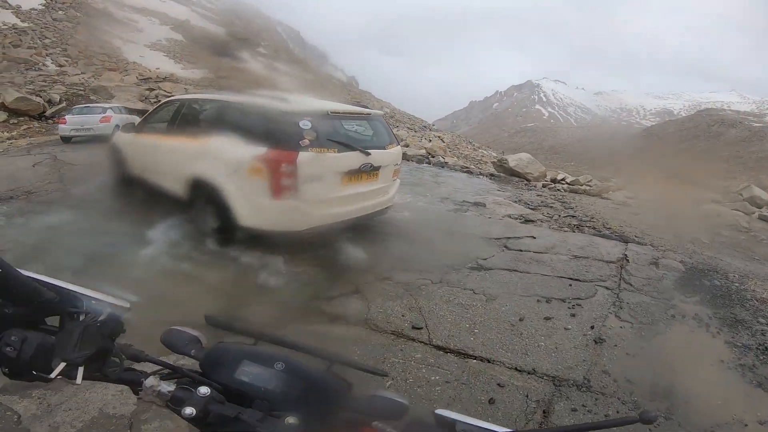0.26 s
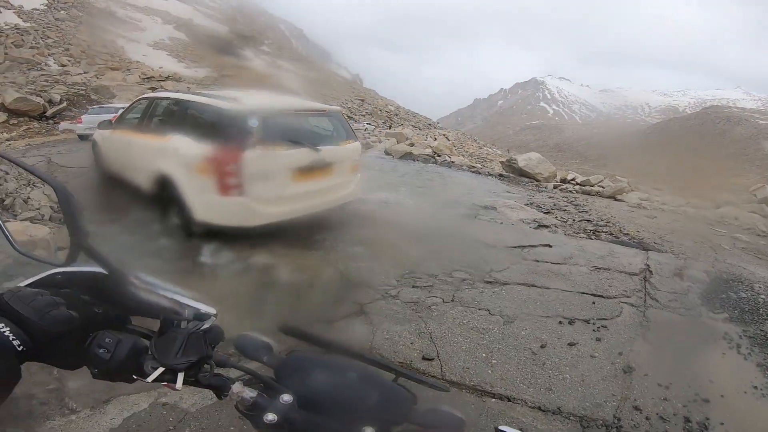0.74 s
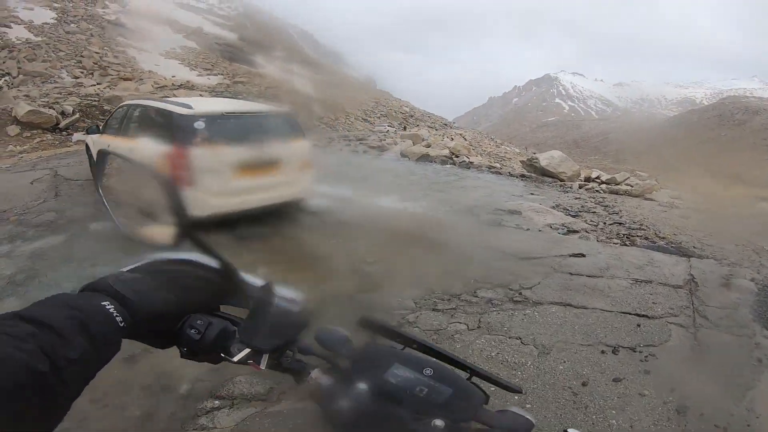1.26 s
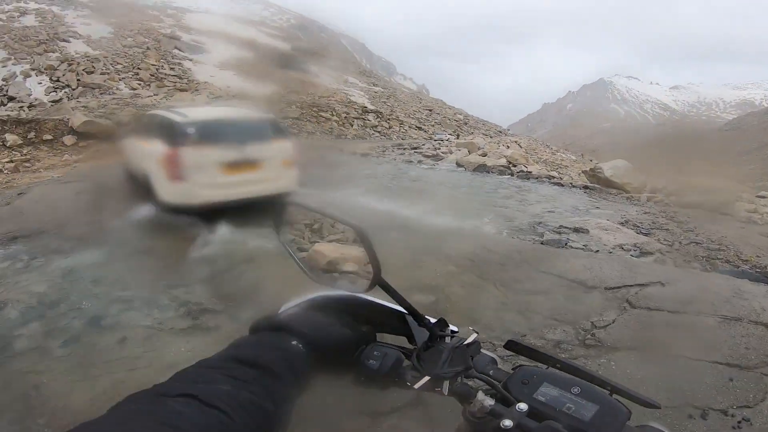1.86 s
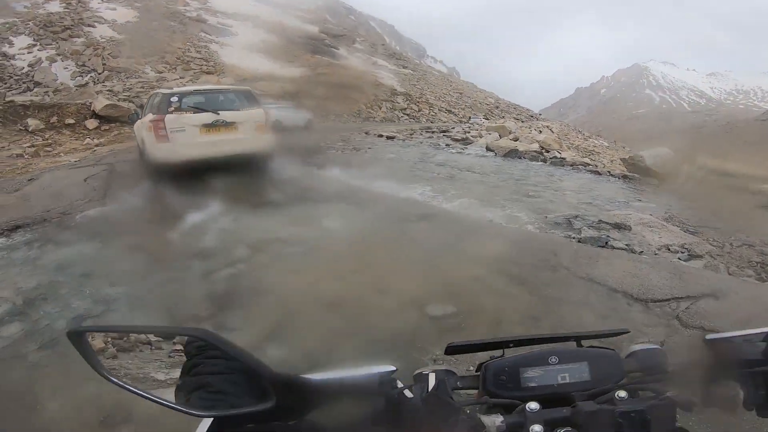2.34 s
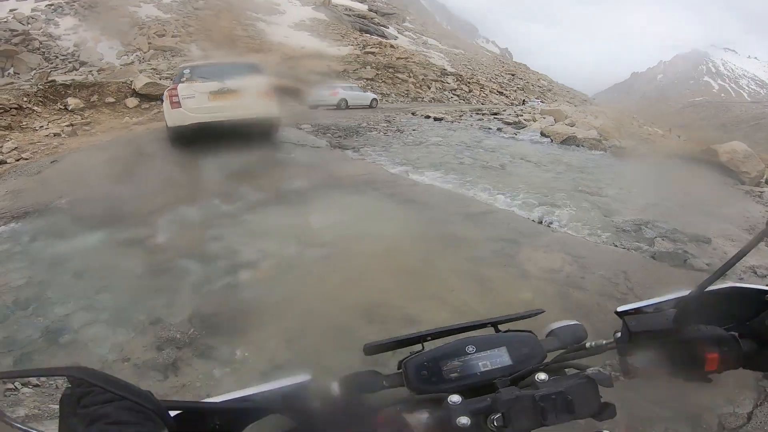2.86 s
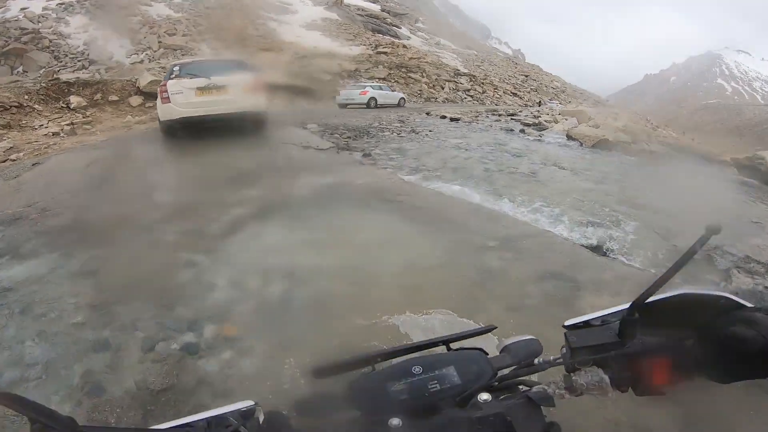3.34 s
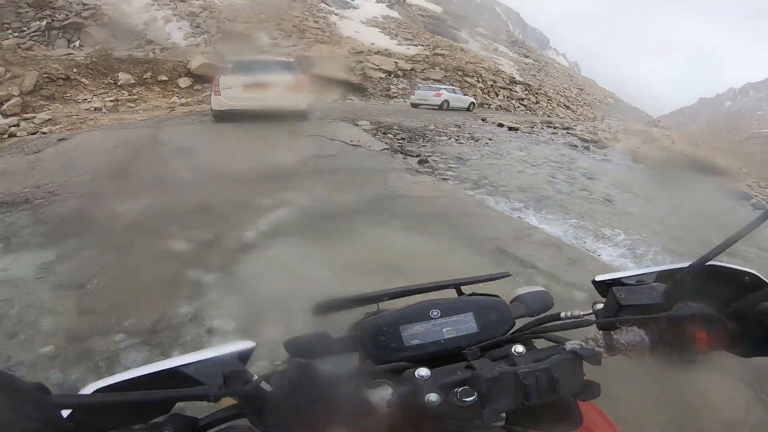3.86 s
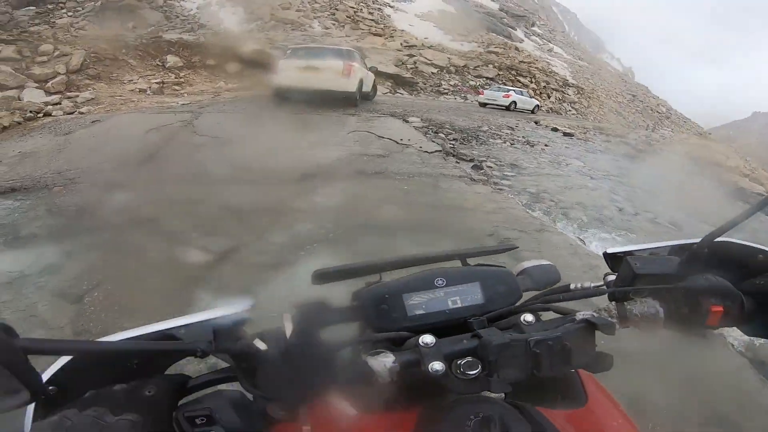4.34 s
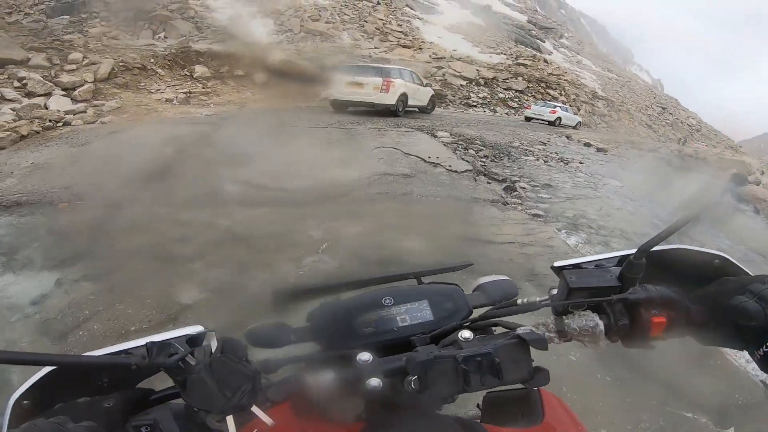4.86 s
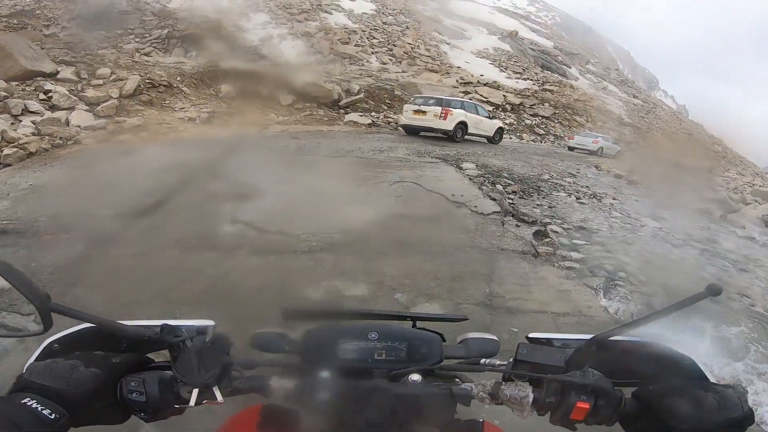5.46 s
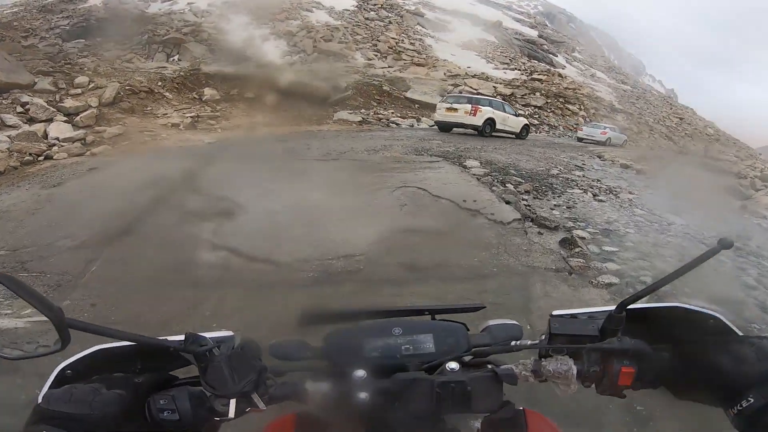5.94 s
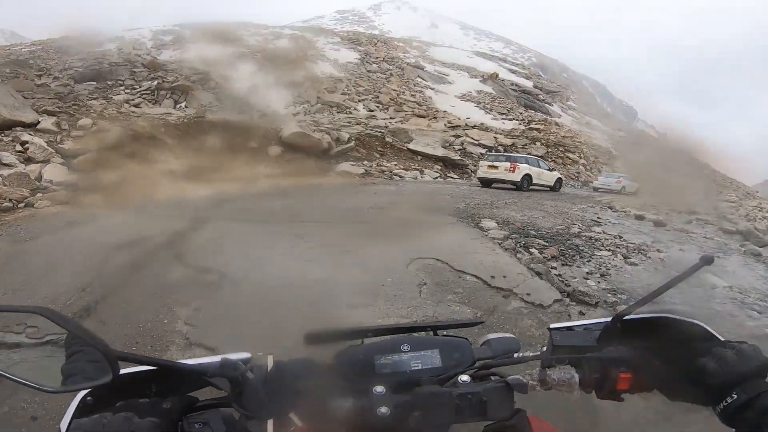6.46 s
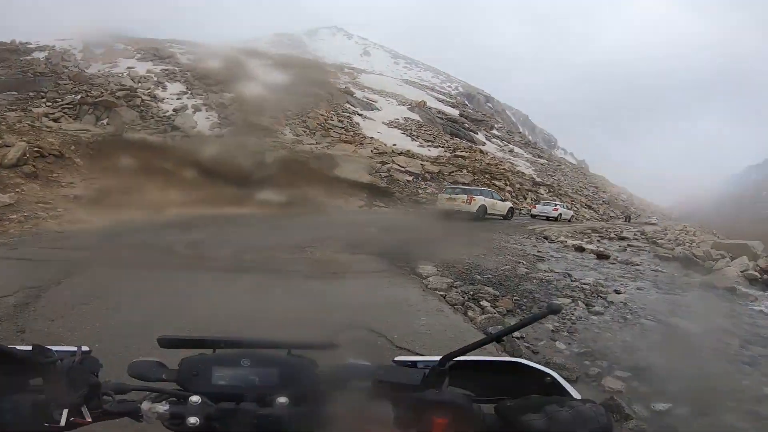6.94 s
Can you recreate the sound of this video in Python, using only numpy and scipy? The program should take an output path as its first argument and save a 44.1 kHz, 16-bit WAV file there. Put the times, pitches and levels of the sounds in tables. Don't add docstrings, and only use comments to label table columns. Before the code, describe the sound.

From 0 to 2.5 s a single-cylinder motorcycle chugs quietly through shallow water: a low wavering hum, briefly revving near 0.5 s, with steady bright spray hiss, mechanical clatter, soft wind buffets and dull bumps at about 0.4-0.8 s. Small splashes come at 0.2, 2.6 and 2.9 s. The revs sag until about 3.2 s into slow, labouring thumps while the water thins. At 3.3-3.6 s stones knock, the underside scrapes and a heavy wind gust rumbles. From 3.7 to 4.3 s loose panels clunk and ring among tiny grit ticks as the throttle opens. The engine climbs quickly to a loud, hollow, rasping roar by 4.9 s, wavering until about 5.8 s, and nearly mono. It then eases down in pitch and loudness to 7.2 s, with buzzing metallic overtones, widening space and returning water hiss. Close chest microphone, outdoors, no noticeable echo.

```python
import sys
import numpy as np
from scipy import signal
from scipy.fft import rfft, irfft
from scipy.io import wavfile
from scipy.ndimage import uniform_filter1d

SR = 44100
rng = np.random.default_rng(int(sys.argv[2]) if len(sys.argv) > 2 else 0)


def transcribe(signal):
    frames = np.atleast_2d(signal).T
    limited = np.clip(frames, -1, 1)
    pcm = np.round(limited * 32767).astype(np.int16)
    wavfile.write(sys.argv[1], SR, pcm)


def boost_factor(decibels):
    exponent = np.asarray(decibels, float) / 20
    return 10 ** exponent


N = 317952
BLOCK = 64


def curves(table):
    s, *columns = np.transpose(table)
    return [np.interp(np.arange(N) / SR, s, c) for c in columns]


def swells(table):
    t = np.arange(N) / SR
    return sum(db * np.exp(-(2 * (t - s) / length) ** 2) for s, db, length in table)


def shape(table, hz):
    f, db = np.transpose(table)
    return np.interp(np.log(np.maximum(hz, 1)), np.log(f), db, left=-120, right=-120)


def resonances(table, hz):
    return sum(top_db / (1 + (2 * (hz - f) / width) ** 2) for f, width, top_db in table)


def colour(x, table, rings=()):
    hz = np.fft.rfftfreq(N, 1 / SR)
    y = irfft(rfft(x) * boost_factor(shape(table, hz) + resonances(rings, hz)), N)
    return y / np.std(y)


def walk(rate):
    k = int(SR / rate)
    held = np.repeat(rng.standard_normal(N // 200 + 2)[:N // k + 1], k)
    w = uniform_filter1d(uniform_filter1d(held, k), k)[:N]
    return w / np.std(w)


def patchy(x, slow_db, quick_db):
    spectrum, hz = rfft(x), np.fft.rfftfreq(N, 1 / SR)
    octave = np.floor(np.log2(np.maximum(hz, 16) / 16))
    bands = (irfft(spectrum * (octave == k), N) * boost_factor(quick_db * walk(16)) for k in range(11))
    return sum(bands) * boost_factor(slow_db * walk(6.8))


def drops(rate, spread_db):
    size = boost_factor(spread_db * rng.exponential(size=N).clip(0, 4.5)) * (rng.random(N) < rate / SR)
    return rng.standard_normal(N) * (1 + uniform_filter1d(size, size=40) * 40 ** .5)


def hits(table, tone):
    out, t = np.zeros(N + SR), np.arange(SR // 3) / SR
    for s, db, hz, t60 in table:
        if tone:
            wave, rise_s = np.sin(2 * np.pi * hz * t), .0015
        else:
            sos = signal.butter(3, [hz / 2, hz * 1.6], "band", fs=SR, output="sos")
            band = signal.sosfilt(sos, rng.standard_normal(len(t)))
            wave, rise_s = .5 * band / np.std(band), 1.5 / hz + .0005
        decay = 1000 ** (-t / max(t60, .005))
        out[int(s * SR):][:len(t)] += boost_factor(db) * wave * decay * (1 - np.exp(-t / rise_s))
    return out[:N]


# start_s, firing_rate_hz
SPEED_CURVE = [(0, 32.5), (.55, 38.9), (.95, 31.7), (1.55, 29.8), (1.9, 25.8), (2.55, 25.3), (3.2, 17.5),
               (4.03, 38.6), (4.19, 41), (4.6, 58), (4.9, 66.8), (5.12, 67.2), (5.33, 63.4), (5.58, 68.6),
               (5.8, 67.1), (6.16, 58.6), (6.63, 52.6), (7.21, 48.1)]
# start_s, cycle_scatter_db, order_wander_db
ROUGHNESS = [(0, .8, 2.2), (2.5, .8, 2.2), (3.2, 2.5, 3), (3.75, 2.1, 3), (4.1, 2.1, 3), (4.3, 1.1, 2.5),
             (4.55, .6, 2.2), (6.1, .5, 1.8), (7.21, .4, 1.8)]


def crank():
    flywheel_s = .1
    scatter_db, wander_db = curves(ROUGHNESS)
    hz = uniform_filter1d(curves(SPEED_CURVE)[0], int(flywheel_s * SR))
    turns = np.cumsum(hz * (1 + .003 * scatter_db * walk(25))) / SR
    cycle = boost_factor(scatter_db * np.interp(turns, np.arange(600), rng.standard_normal(600)))
    return hz, turns, cycle, scatter_db, wander_db


# start_s, level_db over coasting
THROTTLE = [(0, 0.5), (.4, 6), (.7, -2), (1.3, -0.5), (3.1, 2), (3.5, 6.5), (3.9, 15), (4.15, 16),
            (4.45, 10), (4.8, 14.5), (5.2, 13.5), (5.35, 13.5), (5.6, 14.5), (5.95, 10.5), (6.2, 10.5),
            (6.5, 6), (6.9, 5.5), (7.21, 6)]


def throttle():
    return curves(THROTTLE)[0]


# centre_s, pitch_hz, level_db, length_s
BROAD_ORDER_SWELLS = [(4.716, 1210, 3.5, 0.081), (4.78, 2180, 11, 0.22), (4.79, 930, 3, 0.17),
                      (4.835, 1300, 7, 0.056), (5.056, 1000, 10.5, 0.07), (5.545, 1040, 8, 0.23),
                      (5.68, 1830, 8, 0.61), (5.83, 1420, 7, 0.51), (5.92, 1310, 5, 0.24),
                      (5.8, 1180, 3.5, 0.16), (4.953, 1690, -14, 0.43), (.45, 64.6, 0, .2),
                      (0.73, 140, 7.5, 0.16), (0.77, 94, 7.5, 0.21), (1.404, 237, 4.5, 0.25),
                      (1.856, 55, 1.5, .3), (2.14, 126, 6.5, 0.62), (3.6, 46, -7, 0.38), (3.767, 122, 1.5, 0.12),
                      (3.7, 200, -8.5, 0.56), (3.98, 290, -7.5, 0.2), (4.106, 320, -3.5, .1),
                      (4.38, 279, -7.5, 0.17), (4.635, 232, -9.5, 0.097), (4.85, 400, 4, 0.79),
                      (5.8, 260, 1.5, 0.31), (5.504, 130, 9.5, 0.25), (6.205, 231, 3, 0.23),
                      (6.94, 2430, 7.5, 0.88), (7.0, 870, -18, 0.77), (4.665, 180, 12, 0.28),
                      (3.95, 140, 8, 0.35), (4.25, 440, -1.5, 0.27), (5.9, 1300, 1, 0.18),
                      (4.7, 690, -4.5, 0.62), (0.54, 400, -6, 0.27), (4.4, 120, 4, 0.23),
                      (5.545, 272, -8, 0.072), (5.62, 273, 1.5, 0.056), (4.744, 250, 3.5, 0.067),
                      (4.89, 266, -1, .08), (4.99, 269, 2.5, .08), (5.9, 260, -8, 0.16), (5.9, 260, -6, .1),
                      (5.56, 410, 6, .08), (5.62, 410, -5, .06), (5.34, 385, -3, 0.11), (4.64, 355, -3.5, 0.074),
                      (4, 400, 4, .08), (5.21, 390, 2, .08)]
# centre_s, pitch_hz, level_db, length_s
NARROW_ORDER_SWELLS = [(0.48, 1200, 8, .16), (.48, 1680, 8, .14), (0.31, 290, 3.5, 0.14),
                       (5.44, 1060, 5, .06), (5.6, 1100, 6, .08), (5.3, 1200, 8, .16),
                       (6.02, 1400, 12, .06), (6.37, 1100, 7, .08), (5.5, 1500, 7, .2),
                       (6.45, 1230, 4, .16), (6.5, 2400, 14, .16), (6.6, 1120, 8, 0.13),
                       (6.66, 2330, 15, 0.11), (6.7, 1600, 2, 0.12), (6.85, 1610, 10, .3),
                       (6.92, 1110, 4, 0.11), (7.1, 2200, 13, .25), (8.2, 1600, 4, .2),
                       (6.1, 1480, -6, .12), (4.72, 1220, 5, .08), (5.2, 880, 7, .08),
                       (4.84, 1430, 8, .08), (4.84, 1240, 6, .1), (4.9, 1070, 4.5, 0.068),
                       (4.75, 2170, 5.5, .1), (4.9, 2130, 8, .08), (5.75, 1880, 4, 0.28),
                       (5.82, 1340, 1, .15), (4.9, 1400, 4, .1), (5.7, 1900, 3, .1), (5.3, 540, 3, 0.17),
                       (5.55, 545, 3, 0.21), (4.62, 590, 6, .1), (2.58, 105, 8.5, .3), (3.0, 90, 8, .2),
                       (3.3, 85, -10, .14), (4.65, 127, 5, .2), (5.95, 2700, 15, .35), (7.1, 2700, 11, .2),
                       (7.1, 2700, 9, .2)]


def order_swells(f):
    s = np.arange(f.shape[1]) * BLOCK / SR
    db = 0
    for table, spread in ((BROAD_ORDER_SWELLS, 0.14), (NARROW_ORDER_SWELLS, .035)):
        for at, pitch, top_db, length in table:
            width_hz = 41 + spread * pitch
            db = db + top_db * np.exp(-(2 * (s - at) / length) ** 2 - (2 * (f - pitch) / width_hz) ** 2)
    return boost_factor(db)


# firing_rate_hz, order_1_db to order_8_db
ORDER_LEVELS = [(19.3, -43, -30, -45, -48, -47, -37, -40, -50),
                (25.3, -31.5, -25.5, -42, -40, -34, -47.5, -44, -50),
                (30.4, -30.5, -27, -34, -26, -44, -39, -46.5, -41.5),
                (33.45, -28, -29.5, -33.5, -31, -48.5, -42.5, -44.5, -38.5),
                (39, -22.5, -26.5, -37, -46, -47.5, -39, -48, -38),
                (41, -29, -13.5, -25.5, -42, -50.5, -54, -49, -38),
                (49, -26.5, -17.5, -22, -31, -52, -38, -50.5, -50),
                (52.4, -23.5, -18.5, -23.5, -39, -48, -42, -42, -44.5),
                (56.5, -19, -19, -26, -27.5, -39, -41, -47.5, -51),
                (58.8, -17, -24.5, -36, -19.5, -39, -43, -50.5, -44.5),
                (64.24, -14.5, -31, -36.5, -24, -43, -38.5, -58, -45),
                (65.56, -13.5, -39, -40.5, -25.5, -48, -38.5, -67, -52),
                (66.97, -14, -40.5, -45, -22.5, -45.5, -39, -50.5, -45.5),
                (68.1, -14.5, -35.5, -48, -16.5, -47, -42, -56, -42.5)]
# pitch_hz, level_db
PIPE = [(80, -7), (105, 6), (125, 13), (145, -2), (200, -6.5), (240, -1), (290, 4.5), (340, -6.5),
        (400, -1), (460, -8.5), (540, -9), (620, -16.5), (750, -20)]
# pitch_hz, level_db
BAFFLES = [(750, -12), (800, -2.5), (900, -4.5), (1070, -2), (1250, -4.5), (1500, -8.5), (1900, -14.5),
           (2200, -16), (2700, -24.5), (3600, -27)]
# pitch_hz, width_hz, level_db
CASE_MODES = [(550, 60, 4), (1070, 60, 8), (1220, 45, 6), (1450, 60, 5), (2200, 100, 6), (2650, 100, 4),
              (3250, 130, 5), (4530, 70, 6), (5150, 90, 6), (8000, 200, 4), (9800, 300, 6)]


def order_sizes(hz, effort, scatter_db, wander_db):
    coasting_scatter_db = scatter_db[0]
    hz, effort, scatter_db, wander_db = (c[::BLOCK] for c in (hz, effort, scatter_db, wander_db))
    order = np.arange(1, 61)[:, None]
    f = order * hz
    drift = np.array([walk(4 + k / 2.5 + (k > 8) * k / 2.5)[::BLOCK] * (1 + k / 50) for k in order[:, 0]])

    low_wander = .45
    crawl = np.clip(39 - hz, 0, 1)
    rate, *orders_db = np.transpose(ORDER_LEVELS)
    eight_db = [np.interp(hz, rate, db) + .7 * crawl * (.5 - d ** 2) for db, d in zip(orders_db, drift)]
    upper_db = [db + 0.77 * effort + low_wander * wander_db * d for db, d in zip(eight_db[4:], drift[4:])]
    bark_db = -44 + 1.55 * effort - 4.5 * (scatter_db - coasting_scatter_db).clip(0)
    rasp_db = -43 + 0.84 * effort

    db = (order % 2) * np.where(f > 750, -4.5, -5.0 * (f > 200))
    db = db + (4 - 0.85 * effort) * (f > 170) * (f < 280)
    db = db + wander_db * drift * np.where(order < 9, low_wander, 1)
    db = db + np.where(f < 750, shape(PIPE, f), shape(BAFFLES, f) + 0.2 * resonances(CASE_MODES, f))
    size = boost_factor(db) * np.clip((61 - order) / 15, 0, 1)

    part = np.where(order < 5, order - 1, np.where(f < 750, 4, 5))
    for p, load_db in enumerate(eight_db[:4] + [bark_db, rasp_db]):
        mine = part == p
        counted = mine * ((p < 4) | (f > 280))
        rms = np.sqrt(np.sum(counted * size ** 2 / 2, axis=0) + 1e-18)
        size = np.where(mine, size * boost_factor(load_db) / rms, size)
    size[4:8] = 2 ** .5 * boost_factor(np.array(upper_db))
    size = uniform_filter1d(size * order_swells(f), size=20, axis=1)
    return size, part == 5, drift, bark_db, rasp_db


def at_sample_rate(blocks):
    return np.repeat(blocks, BLOCK)[:N]


def exhaust(effort):
    hz, turns, cycle, scatter_db, wander_db = crank()
    size, in_rasp, drift, bark_db, rasp_db = order_sizes(hz, effort, scatter_db, wander_db)
    low, rasp = np.zeros(N), np.zeros(N)
    block_at = np.arange(N) / BLOCK
    for k, a, r, d in zip(range(1, 61), size, in_rasp, np.roll(drift, 7, axis=0)):
        phase = 2.15 * k * k if k < 9 else .03 * k * k + 1.1 * rng.standard_normal()
        slip = .02 * scatter_db * min(k, 25) * np.interp(block_at, np.arange(len(d)), d)
        wave = at_sample_rate(a) * np.sin(2 * np.pi * k * turns + phase + slip)
        high = at_sample_rate(uniform_filter1d(1. * r, size=30))
        low += wave * (1 - high)
        rasp += wave * high * boost_factor(1 - 3.2 * scatter_db)
    gate = 1 + 0.5 * np.exp(-(turns % 1) / 0.25) + 0.76 * np.exp(-((turns + .5) % 1) / 0.038)
    grit = colour(rng.standard_normal(N) * gate * boost_factor(1.8 * walk(30)), BAFFLES, CASE_MODES)
    rasp += grit * at_sample_rate(boost_factor(rasp_db)) * boost_factor(4.5 * scatter_db - 13.5)
    churn = colour(rng.standard_normal(N) * gate, PIPE[4:])
    low += churn * at_sample_rate(boost_factor(bark_db)) * boost_factor(7 * scatter_db - 19.5)
    return low * cycle, rasp * cycle, gate * cycle ** 0.38 / np.sqrt(np.mean(gate ** 2))


# pitch_hz, level_db per Hz
CLATTER_SPECTRUM = [(260, -32), (450, -7), (700, -12), (1070, -12), (1760, -16), (2500, -16), (3400, -17),
                    (4830, -25), (5950, -50), (7800, -77)]


def engine_clatter(gate, effort):
    sound = colour(rng.standard_normal(N) * gate, CLATTER_SPECTRUM, CASE_MODES)
    return sound * boost_factor(-43.5 + 0.68 * effort)


# start_s, level_db
STREAM_LEVEL = [(0, -51), (.56, -49.5), (.9, -52), (2.5, -50), (2.75, -53), (2.95, -54), (3.08, -59),
                (3.25, -62.5), (4.3, -67), (5.6, -66.5), (6.5, -57), (7.21, -55)]
# centre_s, level_db above the stream, length_s
SLOSHES = [
    (.21, 3, 0.069),
    (2.0, -0.5, 0.21),
    (3.18, 3.5, .1),
    (3.42, 3, 0.088),
    (.12, 3, .05),
    (1.35, 1, .12),
    (2.63, 2, .06),
]
# pitch_hz, level_db per Hz
WATER_SPECTRUM = [(210, -37.5), (350, -26.5), (506, 0.5), (543, -4), (866, -1), (1180, -4.5), (1290, -0.5),
                  (1710, -2.5), (2080, -3.5), (2690, -5.5), (3250, -6.5), (4420, -12.5), (7670, -16),
                  (10300, -39.5), (13400, -69.5), (22000, -120)]
# pitch_hz, width_hz, level_db
MUDGUARD_MODES = [(1200, 50, 5), (1680, 60, 4), (2700, 90, 5), (3900, 120, 3), (7600, 200, 3)]
# pitch_hz, level_db per Hz
WATER_APART = [(150, -51), (250, -17), (411, -14), (677, -8), (816, -5.5), (1060, -5.5), (3210, -15),
               (4320, -19), (7450, -18), (8310, -19), (10300, -39), (13400, -60.5), (22000, -120)]


def stream(apart_db):
    water_db = curves(STREAM_LEVEL)[0]
    water = patchy(colour(drops(1500, 2.5), WATER_SPECTRUM, MUDGUARD_MODES), 0.62, 0.46)
    water *= boost_factor(water_db + 15.0 + swells(SLOSHES))
    apart = patchy(colour(drops(1500, 3.0), WATER_APART), .4, 0.9) * boost_factor(apart_db)
    return water, apart, water_db


# centre_s, level_db above the hiss, length_s
SPRAY_BURSTS = [
    (.02, -4, 0.09),
    (.2, 5, 0.078),
    (2.43, 2.5, .3),
    (3.18, 9, 0.033),
    (3.4, -2, 0.67),
    (3.58, 2, .08),
    (4.07, 5.5, 0.55),
]
# pitch_hz, level_db per Hz
VALVE_SPECTRUM = [(3650, -54.5), (6200, -22), (6870, -3), (7840, -1), (8250, 2), (8670, -1), (9550, -7),
                  (10300, -15), (13400, -43), (22000, -120)]


def valve_gear(gate, water_db):
    level_db = -52.5 + 0.19 * (water_db - water_db[0]) + swells(SPRAY_BURSTS)
    sound = colour(rng.standard_normal(N) * gate, VALVE_SPECTRUM, CASE_MODES)
    return sound * boost_factor(level_db - 5.0), level_db


# centre_s, level_db above the rumble, length_s
SCRAPES = [
    (3.33, -1, .04),
    (3.4, 2.5, 0.045),
    (3.43, 12.5, 0.085),
    (3.485, 3.5, .04),
]
# pitch_hz, level_db per Hz
RUMBLE_SPECTRUM = [(15, -8), (30, -3), (70, 3.5), (140, -5), (300, -9.5), (600, -16), (1200, -22)]


def road_rumble(effort):
    sound = patchy(colour(rng.standard_normal(N), RUMBLE_SPECTRUM), 1.2, 2.5)
    return sound * boost_factor(-30.5 - 0.25 * effort + swells(SCRAPES))


# start_s, level_db of their difference kept
PORT_FOLD = [
    (0, -0.5),
    (2.88, -0.5),
    (3.36, -14),
    (3.62, -25),
    (4.2, -25),
    (5.55, -58),
    (5.65, -18.5),
    (6.05, -7.5),
    (6.55, -2),
    (7.21, -2.5),
]


def port_fold():
    return curves(PORT_FOLD)[0]


# centre_s, level_db above the breeze, length_s
GUST_SWELLS = [(0, 4, 0.16), (.5, 14, 0.12), (.85, 5, 0.25), (1.2, 14, 0.15), (1.9, 11, 0.22),
               (2.62, 14, 0.14), (2.82, 15.5, 0.24), (3.0, 18.5, 0.23), (3.13, 21, 0.14), (3.42, 34, 0.29),
               (5.95, 23, 0.082), (6.45, 8, 0.44)]
# pitch_hz, level_db per Hz
WIND_SPECTRUM = [(12, -19.5), (30, -10.5), (60, -5), (130, -14.5), (260, -30.5), (500, -56.5)]


def wind_on_ports(fold_db):
    gust = boost_factor(-41.5 + 1.5 * fold_db + swells(GUST_SWELLS) + 3.0 * walk(8.2))
    return [colour(rng.standard_normal(N), WIND_SPECTRUM) * gust for _ in range(2)]


# pitch_hz, level_db per Hz
AIR_SPECTRUM = [(9300, -20), (10800, -4), (11800, 0), (12600, -1), (14000, -6), (15000, -12), (15800, -22),
                (17000, -60)]


def fine_air():
    return [patchy(colour(drops(800, 3.0), AIR_SPECTRUM), 1.0, 1.5) * boost_factor(-76) for _ in range(2)]


# start_s, level_db, pitch_hz, t60_s
SPLASHES = [
    (0.2014, -22, 6030, 0.12),
    (2.624, -23, 6000, 0.11),
    (2.7794, -32, 5930, 0.12),
    (2.9186, -26, 6100, 0.11),
    (3.1794, -48, 5940, 0.11),
    (4.041, -42, 6030, 0.098),
    (4.145, -46, 6000, 0.089),
]


def splashes():
    return signal.sosfilt(signal.butter(6, 9300, fs=SR, output="sos"), hits(SPLASHES, False))


# start_s, level_db, brightness_hz, t60_s
STONE_KNOCKS = [(3.311, -16.5, 780, 0.073), (3.329, -21, 780, 0.12), (3.375, -30, 300, 0.074),
                (3.40, -22, 300, 0.1), (3.421, -20, 730, 0.22), (3.445, -32, 400, 0.12),
                (3.465, -28, 305, 0.058), (3.747, -17, 396, 0.3), (4.034, -26, 900, 0.06),
                (4.055, -16, 1000, 0.044), (4.145, -19, 1500, 0.033), (5.96, -18, 151, 0.028),
                (.352, -13, 110, 0.076), (.433, -7, 150, .05), (.668, -9, 125, 0.081),
                (.728, -7, 110, 0.083), (.8, -4, 121, 0.096), (1.553, -20, 120, 0.062),
                (1.692, -14, 110, 0.046), (3.147, -11, 130, 0.1), (3.178, -29, 2300, .05),
                (3.2, -20, 302, 0.086), (3.327, -12, 1500, 0.019), (3.362, -24, 1600, 0.11),
                (3.39, -25, 1700, .06), (3.425, -24, 1900, 0.069), (3.455, -26, 2000, .08),
                (3.475, -27, 1700, .08), (3.51, -28, 1600, .08), (3.58, -30, 2000, .06),
                (3.63, -27, 1500, .08), (3.552, -21.5, 950, 0.053), (3.591, -20, 1100, 0.052),
                (3.839, -16, 1100, 0.046), (3.868, -24, 2600, 0.03), (3.915, -8, 70, 0.25),
                (3.99, -2, 65, 0.17), (4.027, -20, 2270, 0.023), (4.066, -27, 2500, 0.04),
                (3.925, -25.5, 2200, .04), (3.985, -28, 2200, 0.045), (4.08, -23, 1900, .03),
                (4.235, -24, 1040, 0.026), (4.275, -32, 3000, .03)]


def stone_knocks():
    return hits(STONE_KNOCKS, False)


# start_s, level_db, pitch_hz, t60_s
LABOURING = [(2.52, -28, 52, .2), (2.605, -22, 60, .2), (2.705, -23, 50, .2), (2.78, -19, 65, 0.17),
             (2.858, -15, 80, .1), (2.915, -21, 50, .15), (2.995, -17, 55, .15), (3.035, -21, 105, .1),
             (3.145, -26, 130, .08), (3.2, -28, 115, .08), (3.418, -21, 150, .05), (1.545, -30, 90, .08),
             (1.685, -25, 70, .1)]


def labouring_thumps():
    return hits(LABOURING, True)


# start_s, level_db, pitch_hz, t60_s
GUARD_RINGS = [
    (3.309, -25, 1090, .05),
    (3.328, -27, 1750, .02),
    (3.327, -21, 600, .03),
    (3.424, -32, 1130, .08),
    (3.416, -16, 110, .14),
    (3.44, -22, 680, .06),
]


def guard_strike():
    return hits(GUARD_RINGS, True)


# start_s, level_db, pitch_hz, t60_s
GRIT_TICKS = [
    (3.7364, -28, 2400, 0.015),
    (3.7714, -28, 2400, 0.015),
    (3.8026, -26, 2400, 0.015),
    (3.8364, -22, 2400, 0.015),
    (3.9227, -28, 2400, 0.015),
    (4.0257, -22, 2400, 0.015),
    (4.0625, -24, 2400, 0.015),
    (4.144, -27, 2400, 0.015),
    (4.2394, -25, 2400, 0.015),
    (4.3304, -28, 2400, 0.015),
]


def grit_ticks():
    return hits(GRIT_TICKS, False)


# start_s, level_db, pitch_hz, t60_s
PANEL_RINGS = [(3.747, -8, 264, 0.03), (3.785, -21, 275, 0.091), (3.915, -19, 287.5, 0.37),
               (3.947, -20, 288, 0.12), (3.977, -16, 293, 0.14), (4.038, -10.5, 381, 0.094),
               (4.057, -14, 315, 0.082), (4.096, -14, 334, 0.064), (4.13, -15.5, 310, 0.078),
               (4.208, -22, 384, 0.27), (4.269, -15, 264, 0.045), (4.33, -19.5, 333, 0.12)]


def loose_panels():
    return hits(PANEL_RINGS, True)


def scene():
    effort, fold_db = throttle(), port_fold()
    apart_db = -38.5 + fold_db
    low, rasp, gate = exhaust(effort)
    clatter = engine_clatter(gate, effort)
    water, water_apart, water_db = stream(apart_db)
    valves, valve_db = valve_gear(gate, water_db)
    wind, air = wind_on_ports(fold_db), fine_air()
    splash = splashes()

    mid = low + rasp + water + clatter + valves + road_rumble(effort) + .7 * wind[0]
    mid += boost_factor(4.0) * (labouring_thumps() + guard_strike() + loose_panels())
    mid += stone_knocks() + grit_ticks() + boost_factor(-13.0) * splash
    mid += air[0] * boost_factor(.4 * (valve_db + 54))

    open_share = boost_factor(apart_db + 39)
    placed = 0.25 * splash - 0.18 * (rasp + clatter) - 0.01 * low - .1 * water - .5 * valves
    side = water_apart + 0.85 * wind[1] + open_share * placed + 0.77 * air[1]
    return np.array([mid + side, mid - side])


def low_pass(x):
    return signal.sosfilt(signal.butter(12, 15500, fs=SR, output="sos"), x)


def record(dry):
    fade = np.sin(np.pi / 2 * np.clip((N - np.arange(N)) / SR / .004, 0, 1)) ** 2
    return low_pass(np.tanh(.6 * dry) / .6 * fade)


dry = scene()
out = record(dry)
transcribe(out)
```